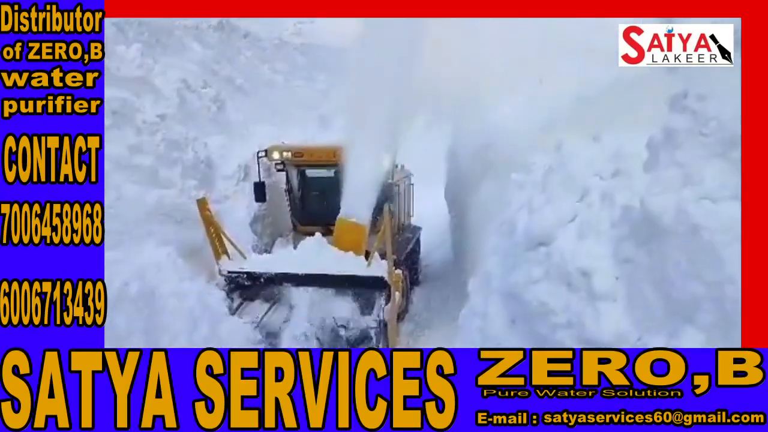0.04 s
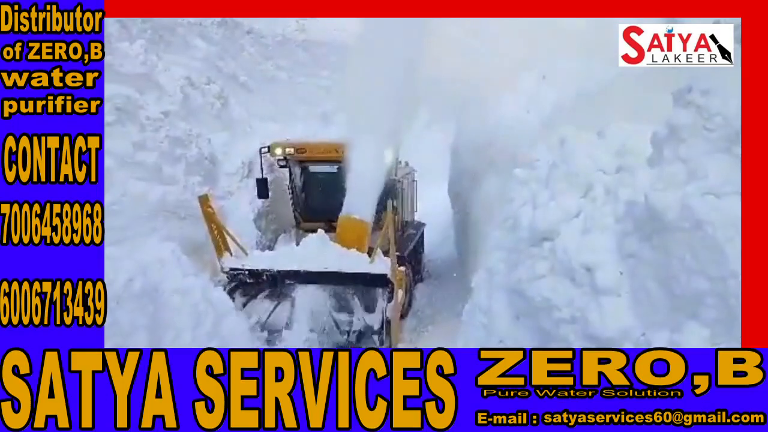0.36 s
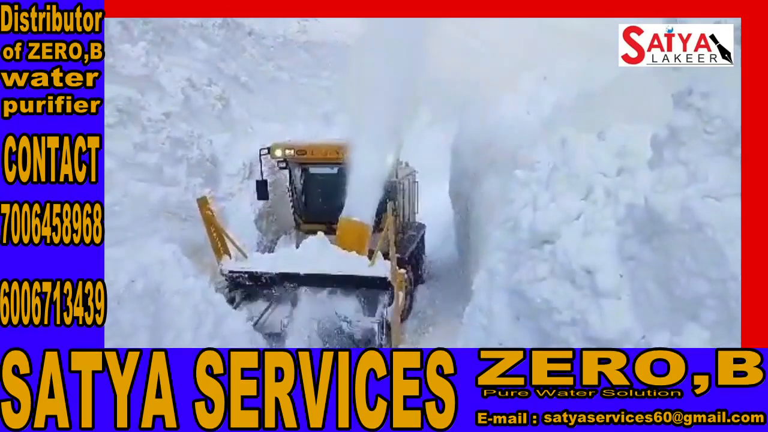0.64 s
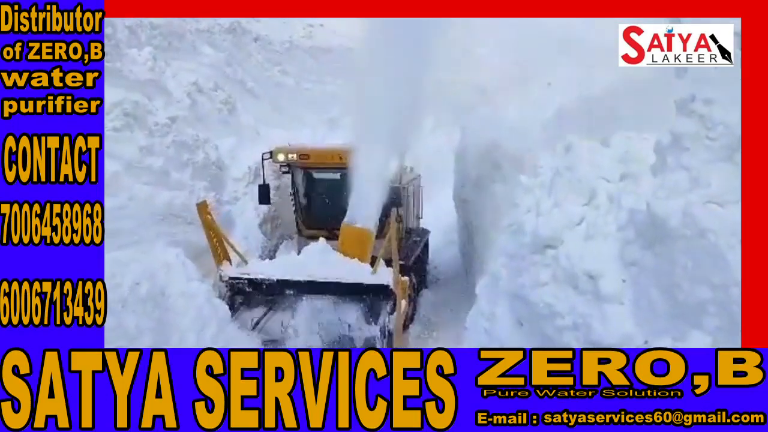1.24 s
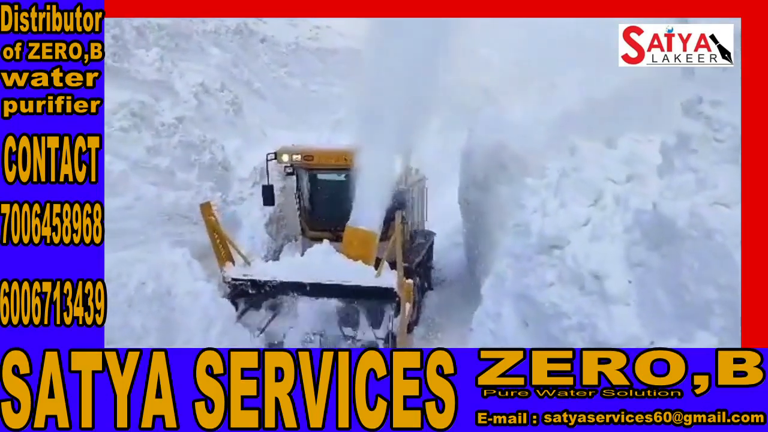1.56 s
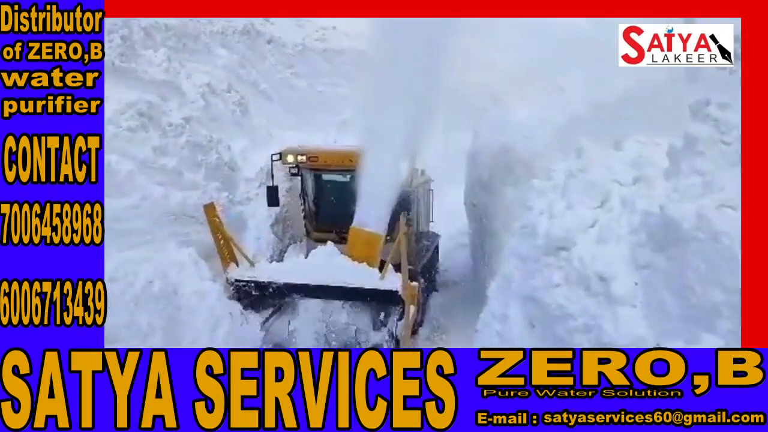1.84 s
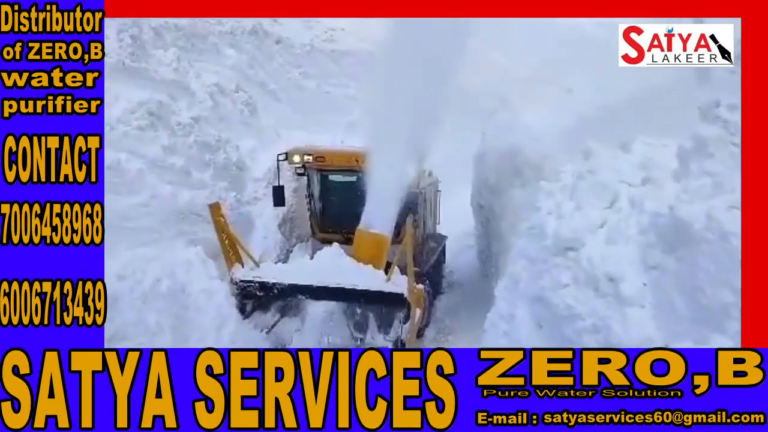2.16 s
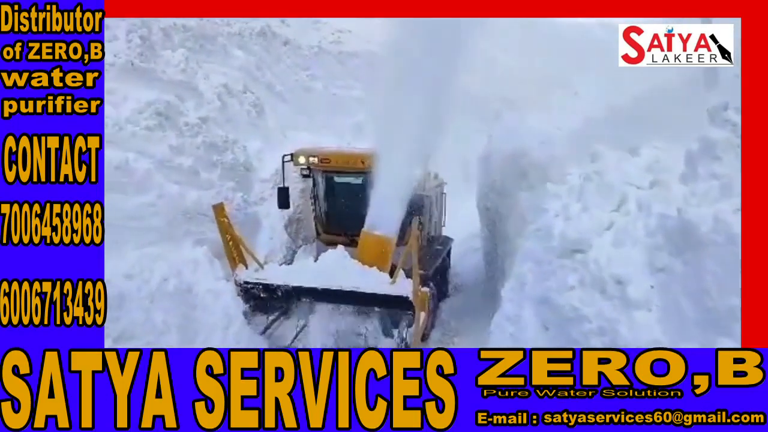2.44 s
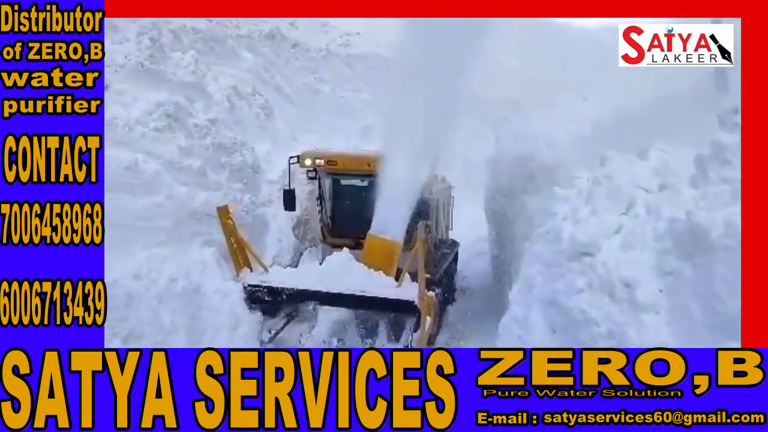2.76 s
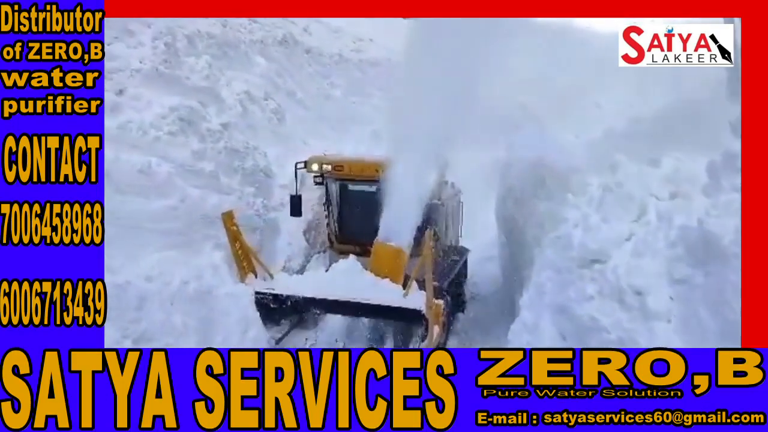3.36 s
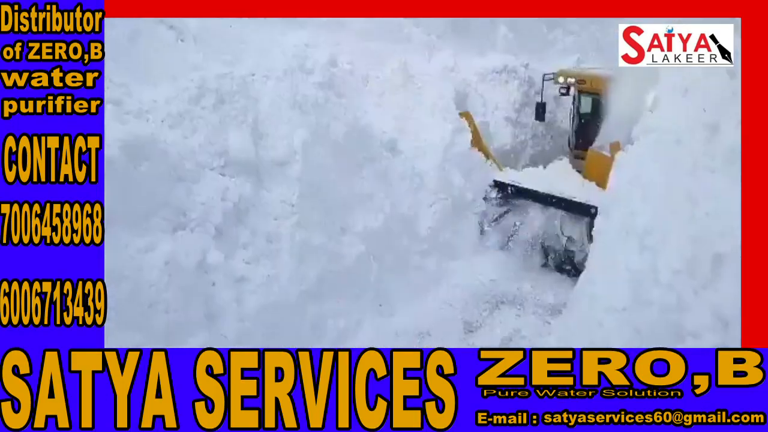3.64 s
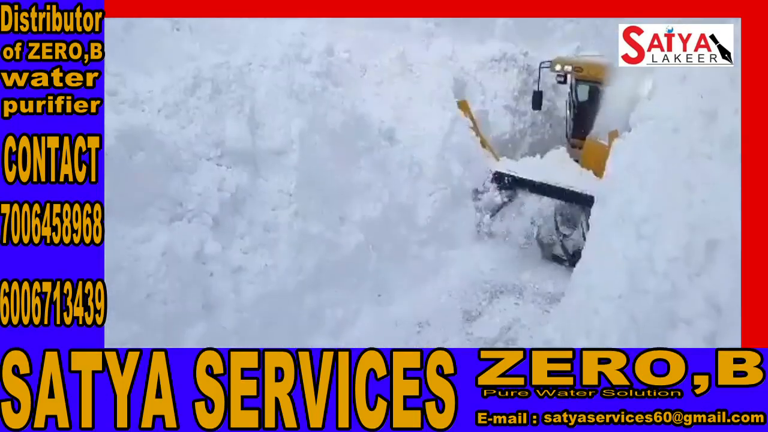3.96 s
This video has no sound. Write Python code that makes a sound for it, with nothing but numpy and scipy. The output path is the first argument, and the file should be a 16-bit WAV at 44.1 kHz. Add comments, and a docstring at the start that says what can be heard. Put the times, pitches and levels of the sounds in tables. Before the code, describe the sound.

A diesel snow blower throbs and roars as it throws snow.

```python
"""A diesel snow blower cuts through a deep drift. Its exhaust throbs at multiples of the crank rate, the
impeller and drive drone, a pump hums and a turbo whistles. Snow roars out of the chute over a turbulent
rumble, with crumbs pattering and a few lumps knocking on the metal. The bass overloads the microphone.
Near the end the sound cuts out with a tick and fades back in, duller, from behind a snow bank."""
import sys
import numpy as np
from scipy import signal
from scipy.fft import rfft, irfft
from scipy.io import wavfile
from scipy.ndimage import uniform_filter1d

SR = 44100
rng = np.random.default_rng(int(sys.argv[2]) if len(sys.argv) > 2 else 0)


def dump(signal):
    """Clip the signal to [-1, 1] and save it as 16-bit WAV at the path in sys.argv[1]."""
    limited = np.clip(np.atleast_2d(signal).T, -1, 1)
    pcm = np.round(limited * 32767).astype(np.int16)
    wavfile.write(sys.argv[1], SR, pcm)


N = 176400
T = np.arange(N) / SR
HZ = np.fft.rfftfreq(N, 1 / SR)
CUT_S, RETURN_S = 3.5598, 3.7157


def amp(db):
    """Decibels to gain."""
    return 10 ** (np.asarray(db) / 20)


def unit(x):
    """Scales to rms 1."""
    return x / np.sqrt(np.mean(x ** 2) + 1e-20)


def curve(rows):
    """Automation curve through rows of time_s, value."""
    return np.interp(T, *np.transpose(rows))


def spectrum(rows):
    """Curve through rows of freq_hz, value, on a log-frequency axis."""
    hz, value = np.transpose(rows)
    return np.interp(np.log(HZ + 1), np.log(hz + 1), value)


def noise(gains):
    """Noise of rms 1, coloured by a gain at each frequency."""
    return unit(irfft(rfft(rng.standard_normal(N)) * gains, N))


def drift(rate_hz):
    """Smooth random wander of rms 1, up to about the given rate."""
    return noise(np.exp(-(HZ / rate_hz) ** 2) * (HZ > 0))


def resonance(hz, width_hz):
    """Noise ringing in one resonance."""
    return noise(1 / (1 + ((HZ - hz) / width_hz) ** 2))


def tone(cycles, rms_db):
    """A sine that follows a running count of cycles."""
    return np.sqrt(2) * amp(rms_db) * np.sin(2 * np.pi * cycles)


# Stereo balance: freq_hz, left_minus_right_db
BALANCE = [(200, 1), (450, 0.8), (750, 0.5), (1100, -1), (1600, -1.3), (2400, -5), (3500, -4), (4900, -9),
           (5900, -1.5), (6700, 1), (8200, 11), (9200, 3), (12700, 2.5)]
# Likeness of the two channels: freq_hz, coherence (0-1)
COHERENCE = [(100, 0.98), (300, 0.87), (600, 0.76), (1100, 0.52), (1500, 0.32), (2300, 0.13), (3400, 0.387),
             (4500, .12), (5600, 0.15), (6300, 0.63), (8200, 0.18), (9500, 0.88), (12500, 0.69)]
# Phase between the channels: freq_hz, left_lead_rad
LEFT_LEAD = [(100, 0), (500, -0.06), (1100, 0.13), (1500, -1.53), (1900, -3), (2300, 1.87), (3200, 0),
             (4500, -0.3), (6000, 0.5)]

def spread(a, b):
    """Spreads two unrelated sounds over a pair of microphones."""
    left, alike = rfft(a), np.clip(spectrum(COHERENCE), 0, 1)
    right = (alike * left + np.sqrt(1 - alike ** 2) * rfft(b)) * np.exp(-1j * spectrum(LEFT_LEAD))
    tilt = amp(spectrum(BALANCE) / 2)
    return irfft(np.array([left * tilt, right / tilt]), N)


# Engine speed: time_s, turns_per_s
CRANK_SPEED = [(0, 25.32), (.85, 25.17), (1.15, 25.55), (2, 25.61), (2.6, 25.58), (4, 25.58)]

def crankshaft(first_beat_s=.0173, skip_turns=.22):
    """Running count of engine turns; the beat slips by part of a turn at the cut."""
    turns = np.cumsum(curve(CRANK_SPEED)) / SR
    return turns - first_beat_s * CRANK_SPEED[0][1] - skip_turns * (T > CUT_S)


# Exhaust partials before the low cut: crank_multiple, level_db
EXHAUST_ORDERS = [(1, -17), (2, -11.5), (3, -12.3), (4, -31), (5, -37.5), (7, -35), (8, -41.5), (9, -37.5)]

def exhaust(turns, waver_db=.92, jitter_turns=.004, low_cut_hz=23):
    """Low crank orders pile up into a throb once a turn; a gentle low cut thins the deepest throb."""
    turns = turns + jitter_turns * drift(4.8)
    puffs = sum(tone(order * turns, db + waver_db * drift(1.3)) for order, db in EXHAUST_ORDERS)
    return signal.lfilter(*signal.butter(1, low_cut_hz, "high", fs=SR), puffs)


# Colour of the rumble: freq_hz, gain_db
RUMBLE_EQ = [(8, -19.5), (20, -11.5), (33, 1), (58, 1), (80, 2.5), (105, -6), (140, -6.5), (200, -30.5),
             (400, -60), (2000, -120)]

def rumble(load):
    """Low turbulence of the auger and chute, a little stronger under load."""
    return noise(amp(spectrum(RUMBLE_EQ))) * amp(-16.65 + 1.1 * load)


# Colour of the thrown snow: freq_hz, gain_db
ROAR_EQ = [(60, -19.5), (150, 3), (230, -0.5), (330, -1.5), (480, -1), (620, -4), (900, -6), (1150, -8),
           (1450, -9), (2200, -11.5), (3200, -15.5), (4200, -19.5), (5100, -22.5), (6200, -27.5),
           (8400, -34.5), (9800, -45.5), (12500, -43)]
# Ride on the high snow spray: time_s, gain_db
SPRAY_RIDE = [(0, 1), (.6, 2), (1.3, 1.8), (2, 1.8), (2.5, 2.5), (2.9, 3.5), (3.3, 2.5), (3.6, 2.5),
              (4, 3.5)]

def snow_roar(turns, load, level_db=-21.5, patch_db=1.72, flicker_db=.55, throb=.12, churn=.1):
    """Thrown snow and machine clatter: patchy noise that pulses with each engine turn."""
    # Two noise spectrograms share the same louder and softer patches in time and frequency.
    re_a, im_a, re_b, im_b, patches = rng.standard_normal((N // 128 + 5, 257, 5)).T
    patches = uniform_filter1d(patches, size=5, axis=0)
    patches = unit(uniform_filter1d(patches, size=16, axis=1))
    frames = np.array([re_a + 1j * im_a, re_b + 1j * im_b]) * amp(patch_db * patches)
    patchy = signal.istft(frames, nperseg=512, noverlap=384)[1][:, :N]
    coloured = rfft(patchy) * amp(spectrum(ROAR_EQ))
    lows = 1 / (1 + (HZ / 1500) ** 2)
    body = irfft(coloured * lows, N) * amp(2.5 * load)
    spray = irfft(coloured * (1 - lows), N) * amp(curve(SPRAY_RIDE))
    pulse = 1 + throb * (np.sin(np.pi * turns) ** 2 - .5) + churn * drift(160)
    return spread(*unit(body + spray) * pulse * amp(level_db + flicker_db * drift(32)))


# Impeller partials: blade_rate_multiple, level_db
BLADE_PARTIALS = [(1, -16), (2, -25)]

def impeller(blade_hz=39, first_blade_s=.019):
    """Passing blades drone; their second partial beats slowly against the engine's firing."""
    passes = blade_hz * (T - first_blade_s)
    return sum(tone(multiple * passes, db) for multiple, db in BLADE_PARTIALS)


# Drive hums: full_speed_pitch_hz, loaded_level_db, unloaded_drop_db, waver_db, jitter_cycles
DRIVE_HUMS = [(85.7, -16, 7.5, 1.7, 0.014), (170.4, -30.5, 9.5, 3.5, 0.087), (262, -38, 3.5, 3, .2)]

def drive(turns, load):
    """The hums of the drive follow the engine speed and swell with the load."""
    engine_clock_s = turns / CRANK_SPEED[-1][1]
    hum = np.zeros(N)
    for hz, db, drop, waver, jitter in DRIVE_HUMS:
        level_db = db - drop * (1 - load) + waver * drift(4.2)
        hum += tone(hz * engine_clock_s + jitter * drift(5.3), level_db)
    return hum


# Pump tuning: time_s, pitch_hz
PUMP_GLIDE = [(0, 162.5), (.9, 161.3), (1.25, 164), (1.55, 165.8), (2.4, 165.8), (3, 164.7), (4, 164.3)]
# Pump partials: pitch_multiple, loaded_level_db, unloaded_drop_db
PUMP_PARTIALS = [(1, -27.5, 5), (2, -34, 4), (3, -40, 5.5)]

def pump(load, waver_db=1, jitter_cycles=.035):
    """A hydraulic pump hums at its own, slightly wandering speed."""
    cycles = np.cumsum(curve(PUMP_GLIDE)) / SR + jitter_cycles * drift(6)
    return sum(tone(multiple * cycles, db - drop * (1 - load) + waver_db * drift(5))
               for multiple, db, drop in PUMP_PARTIALS)


# Turbo tuning: time_s, pitch_hz
TURBO_GLIDE = [(0, 3485), (.15, 3500), (.7, 3495), (.95, 3490), (1.15, 3515), (1.4, 3535), (1.58, 3544),
               (1.68, 3528), (1.85, 3555), (2.05, 3525), (2.45, 3528), (2.55, 3540), (2.63, 3522),
               (2.75, 3545), (3.32, 3540), (3.4, 3512), (3.52, 3542)]
# Turbo ride before flutter and panning: time_s, level_db
TURBO_RIDE = [(0, -44), (.06, -35), (.62, -36.5), (.85, -44), (.94, -39), (1, -41), (1.15, -39),
              (1.25, -47), (1.38, -41.5), (1.7, -37.5), (1.78, -47), (2.02, -38), (2.2, -36), (2.33, -52),
              (2.56, -35), (2.68, -43), (3.05, -53), (3.25, -42), (3.41, -34), (3.55, -42)]

def turbo(load, flutter_hz=17.9, flutter_db=2.5):
    """The turbo whistles right of centre and falters more under load."""
    unrest = .63 + .37 * load
    hz = curve(TURBO_GLIDE) + flutter_hz * unrest * drift(60)
    level_db = curve(TURBO_RIDE) - flutter_db * unrest * drift(22) ** 2
    return tone(np.cumsum(hz) / SR, level_db) * amp([[-2.5], [1.5]])


# Gear whines before panning: pitch_hz, width_hz, level_db
GEAR_WHINES = [(1164, 36, -41), (1888, 7.5, -46.5), (2464, 5.2, -47.5)]

def gears():
    """Gears whine faintly in narrow bands, right of centre."""
    return sum(amp(db) * resonance(hz, width) for hz, width, db in GEAR_WHINES) * amp([[-4], [2]])


def crumbs(hits_per_s=150, level_db=-36.5, decay_s=.005):
    """Crumbs of snow patter on the chute, each ringing the metal briefly."""
    t, patter = T[:2048], np.zeros(N)
    pitches_hz = np.geomspace(350, 1800, num=16)
    for hz in pitches_hz:
        hits = rng.random(N) < hits_per_s / len(pitches_hz) / SR
        strength = amp(3.7 * np.minimum(rng.exponential(1, N), 3))
        ring = np.exp(-t / decay_s) * np.sin(2 * np.pi * hz * t) / np.sqrt(hz)
        patter += signal.oaconvolve(hits * strength, ring)[:N]
    return amp(level_db) * unit(patter)


# Lumps in the chute: start_s, length_s, pitch_hz, width_hz, level_db
SNOW_LUMPS = [(1, 0.41, 135, 33, -21.5), (1.656, 0.055, 722.5, 20, -19.5), (1.672, 0.033, 650, 450, -23),
              (1.921, 0.022, 1150, 91, -22.5), (3.1, 0.23, 210, 50, -25)]

def lumps():
    """Large lumps knock and scrape through the chute, each a swell of ringing noise."""
    return sum(amp(db) * np.sin(np.pi * np.clip((T - start) / length, 0, 1)) * resonance(hz, width)
               for start, length, hz, width, db in SNOW_LUMPS)


# Shading by the snow bank: freq_hz, gain_db
BANK_EQ = [(50, -1.5), (80, -2.5), (170, -1), (400, -3.5), (900, -4.5), (1400, -6.5), (2200, -1.5),
           (4000, -6), (6500, -9.5), (12000, -3)]

def snow_bank(sound):
    """A bank of snow shades the machine, leaving it softer and duller."""
    return irfft(rfft(sound) * amp(spectrum(BANK_EQ)), N)


# Load on the machine: time_s, load (0-1)
MACHINE_LOAD = [(0, 0.5), (.85, 0), (1.25, .8), (1.75, 0.99), (2.3, 1), (3.2, 0.98), (4, 0.89)]
# Engine effort, riding the exhaust and rumble: time_s, gain_db
EFFORT_RIDE = [(0, -1), (.35, -1.2), (.65, 1), (1.1, 0.4), (1.5, -2), (1.73, 3.5), (1.9, 3.5), (2.05, -.5),
               (2.25, -2.5), (2.75, 0.3), (3.05, -0.7), (3.35, 0.8), (3.53, 1.4), (4, 0.7)]

def scene():
    """The whole machine in the open, then behind the bank without its turbo and gear whines."""
    turns, load = crankshaft(), curve(MACHINE_LOAD)
    bass = (exhaust(turns) + spread(rumble(load), rumble(load))) * amp(curve(EFFORT_RIDE))
    machine = bass + snow_roar(turns, load) + impeller() + drive(turns, load) + pump(load)
    machine += lumps() + crumbs()
    return np.where(T < CUT_S, machine + turbo(load) + gears(), snow_bank(machine))


def record(dry, ceiling=.94, overload_slope=.035, fade_s=.15, high_cut_hz=13100):
    """Overload flattens the bass peaks; the sound cuts out with a tick and fades back in."""
    clipped = np.clip(dry, -ceiling, ceiling)
    overloaded = clipped + overload_slope * (dry - clipped)
    gate = (T < CUT_S) + np.clip((T - RETURN_S) / fade_s, 0, 1)
    tick = amp(-9) * np.exp(-abs(T - CUT_S) / .00003)
    high_cut = signal.firwin(1023, high_cut_hz, window=("kaiser", 9), fs=SR)
    return signal.oaconvolve(overloaded * gate - tick, high_cut[None], "same")


dry = scene()
out = record(dry)
dump(out)
```